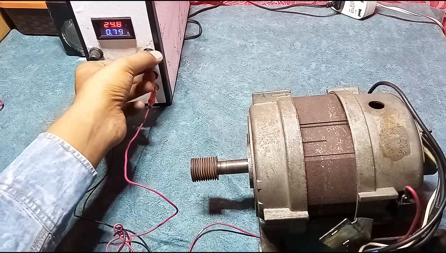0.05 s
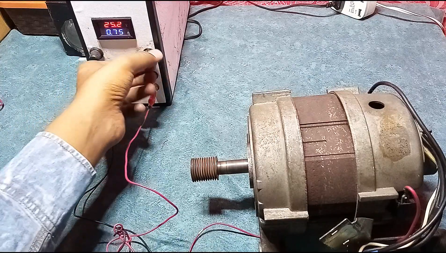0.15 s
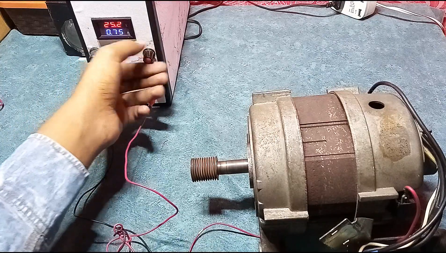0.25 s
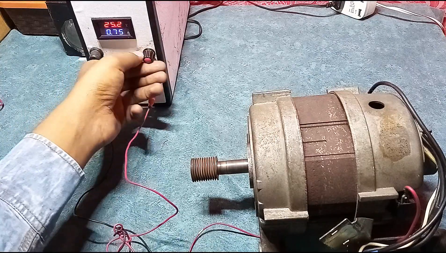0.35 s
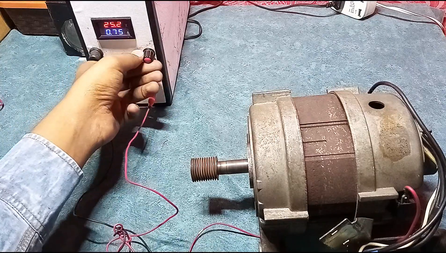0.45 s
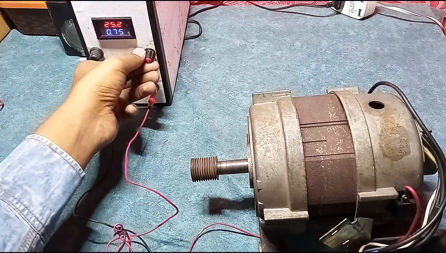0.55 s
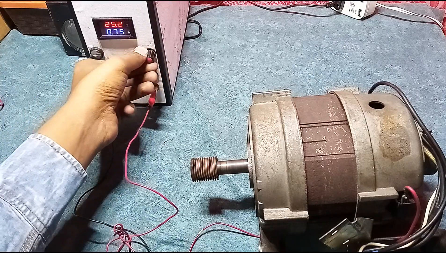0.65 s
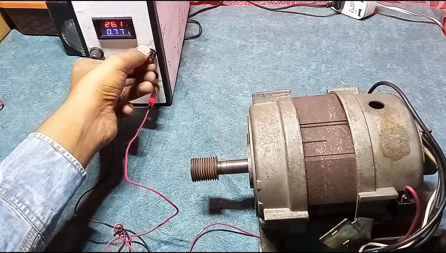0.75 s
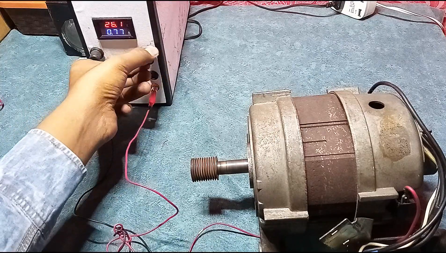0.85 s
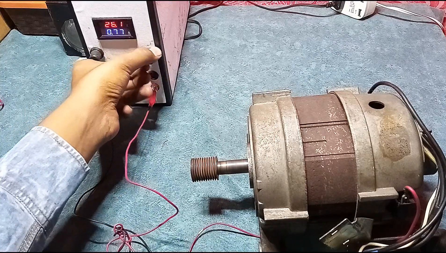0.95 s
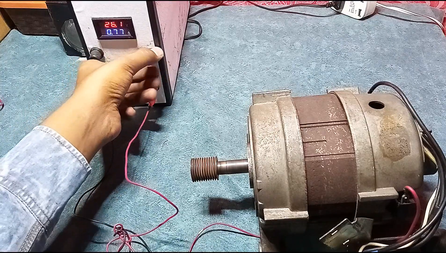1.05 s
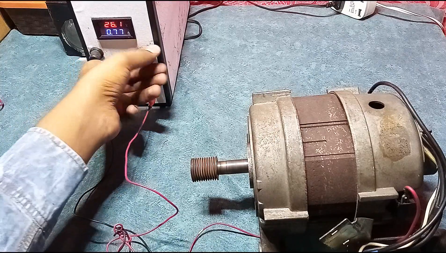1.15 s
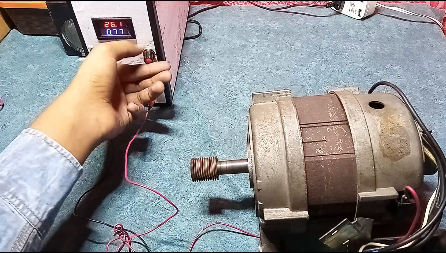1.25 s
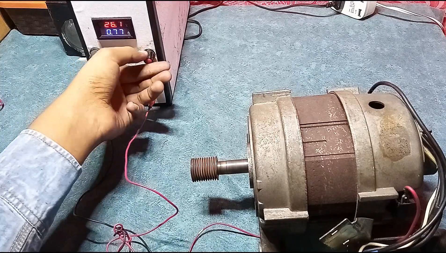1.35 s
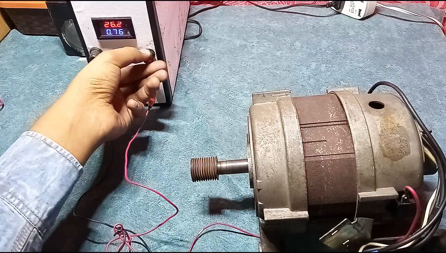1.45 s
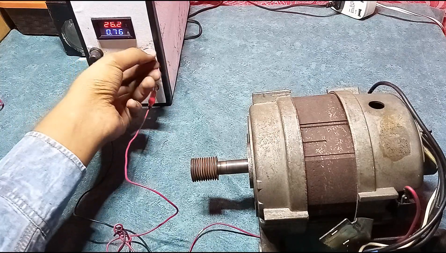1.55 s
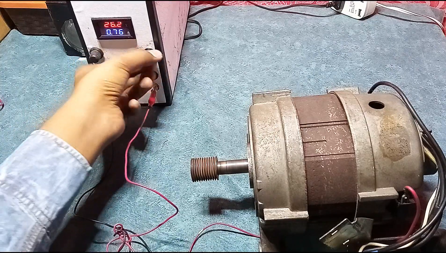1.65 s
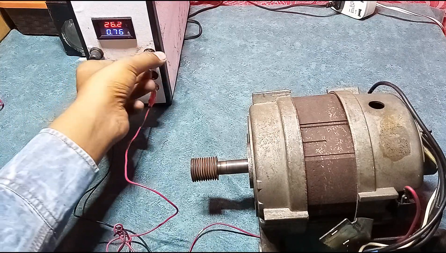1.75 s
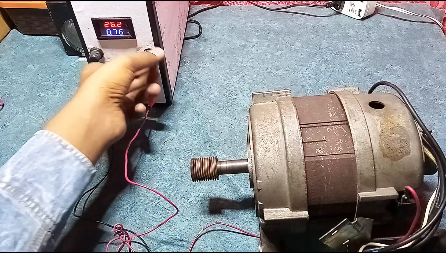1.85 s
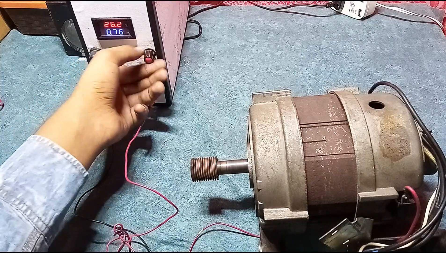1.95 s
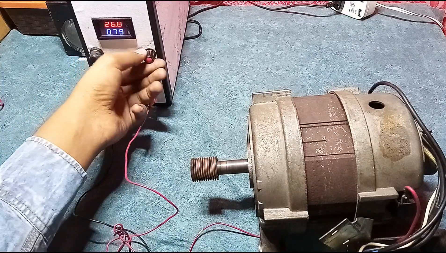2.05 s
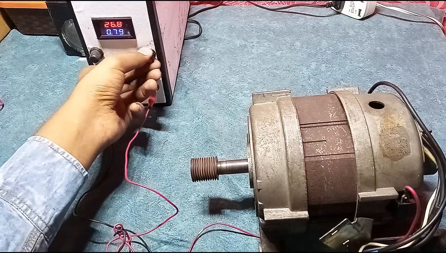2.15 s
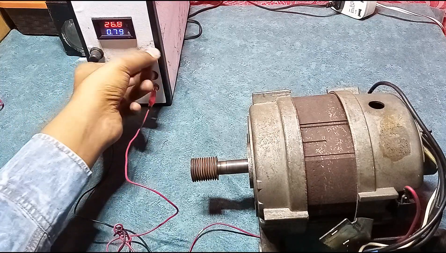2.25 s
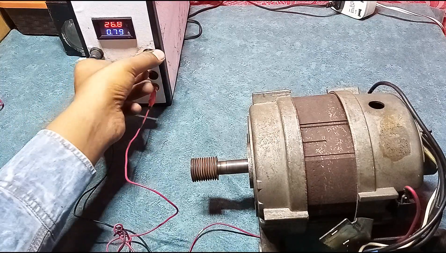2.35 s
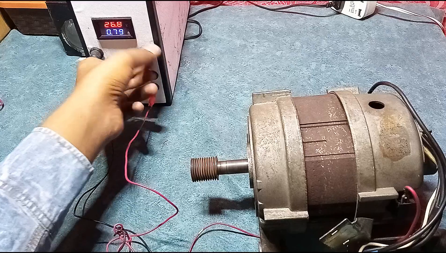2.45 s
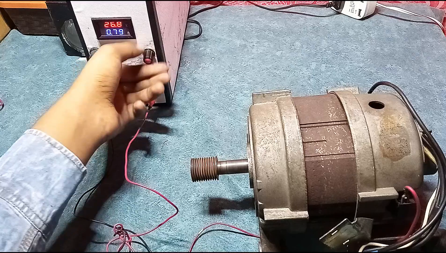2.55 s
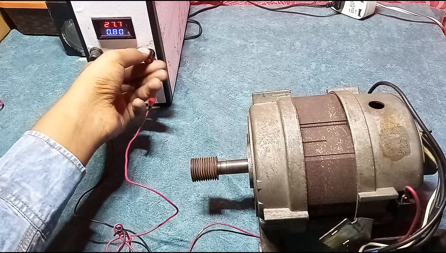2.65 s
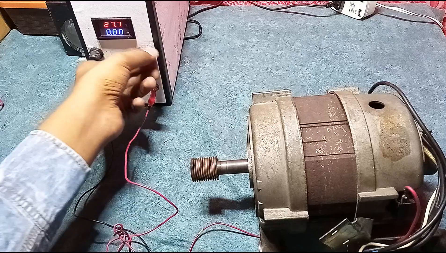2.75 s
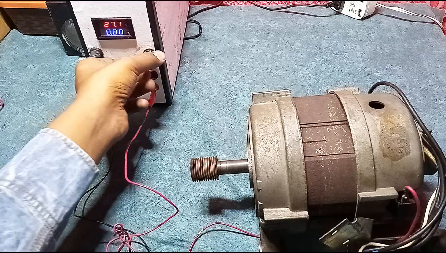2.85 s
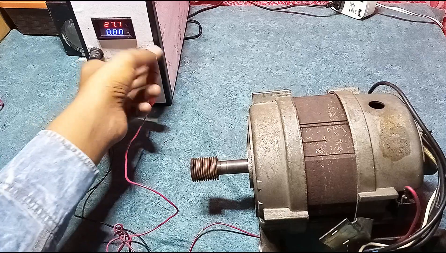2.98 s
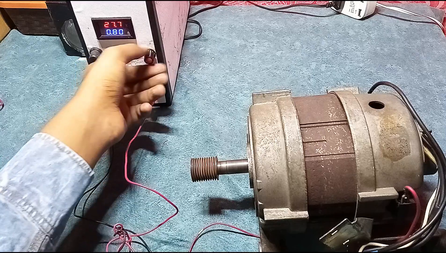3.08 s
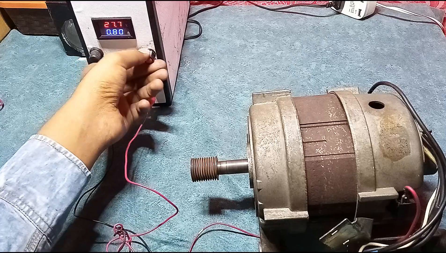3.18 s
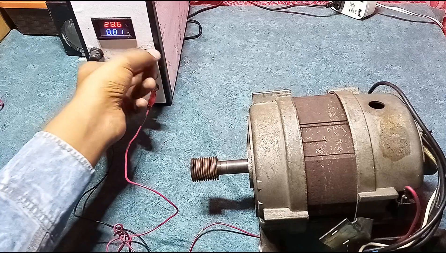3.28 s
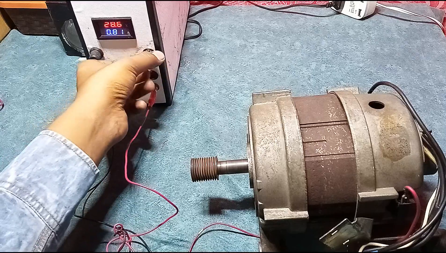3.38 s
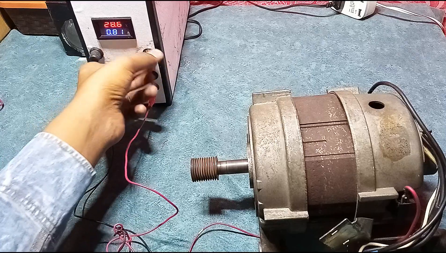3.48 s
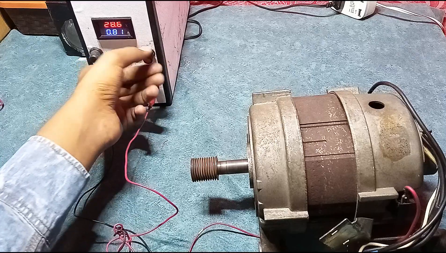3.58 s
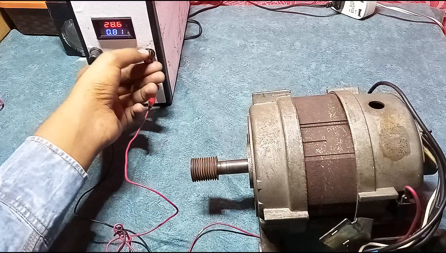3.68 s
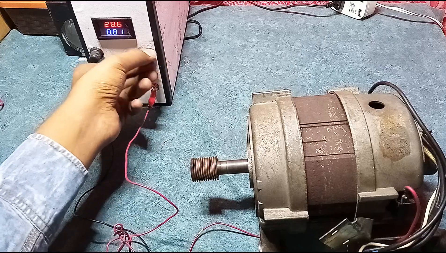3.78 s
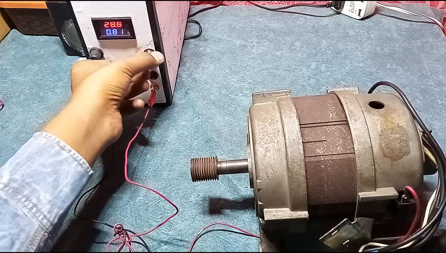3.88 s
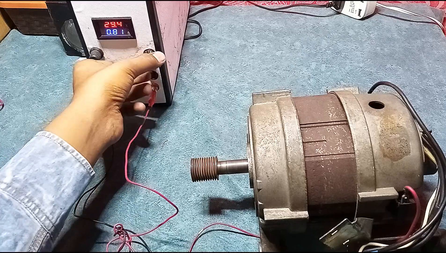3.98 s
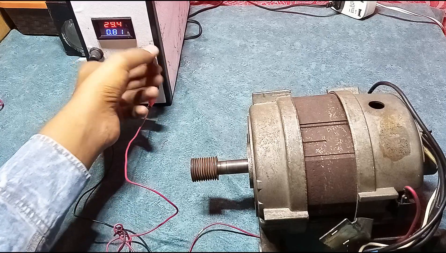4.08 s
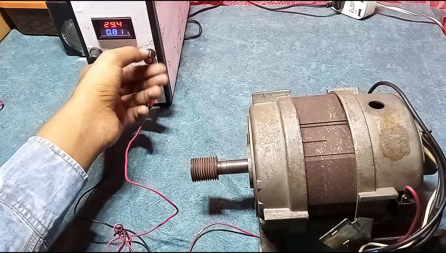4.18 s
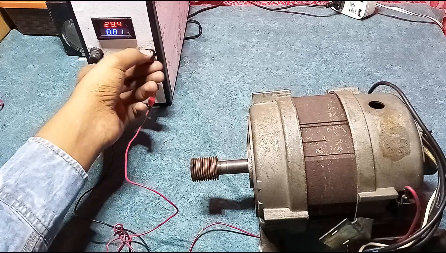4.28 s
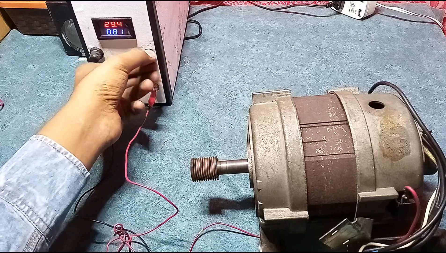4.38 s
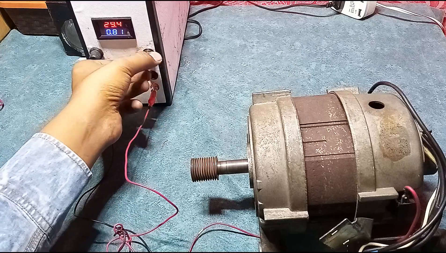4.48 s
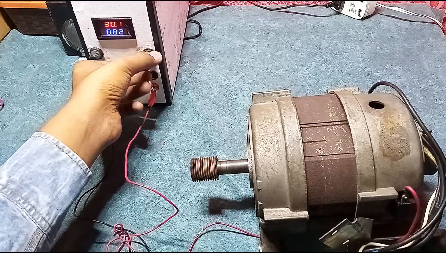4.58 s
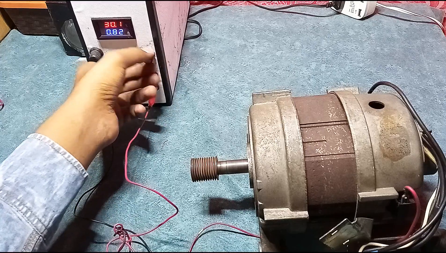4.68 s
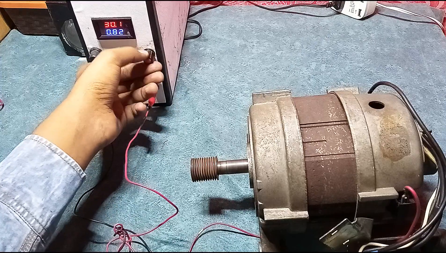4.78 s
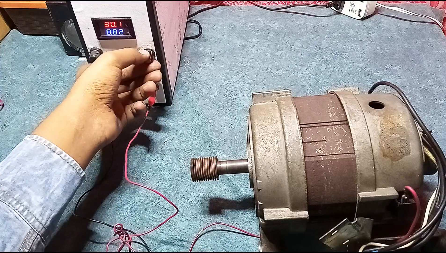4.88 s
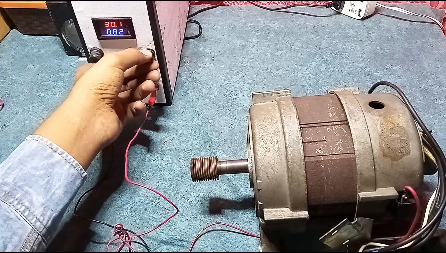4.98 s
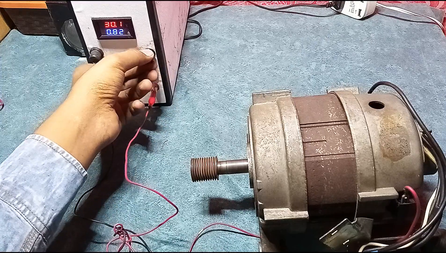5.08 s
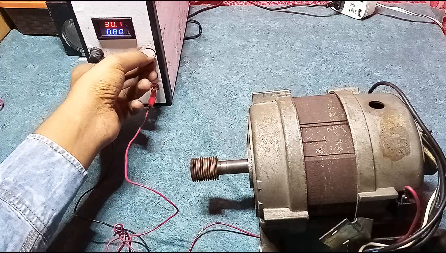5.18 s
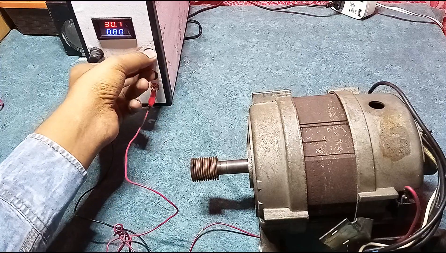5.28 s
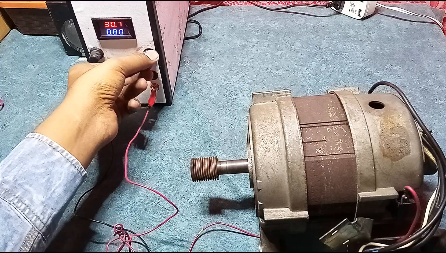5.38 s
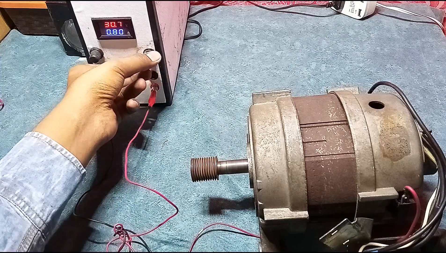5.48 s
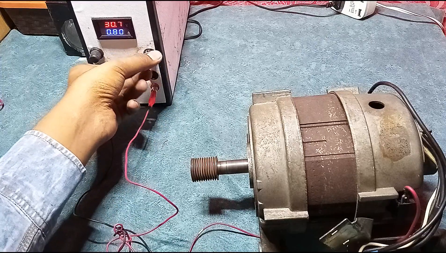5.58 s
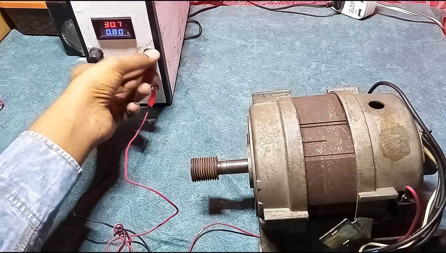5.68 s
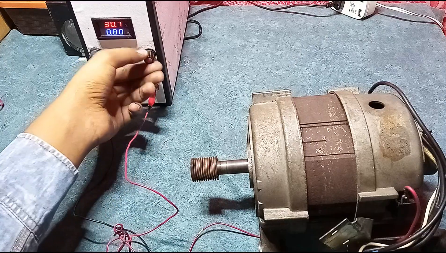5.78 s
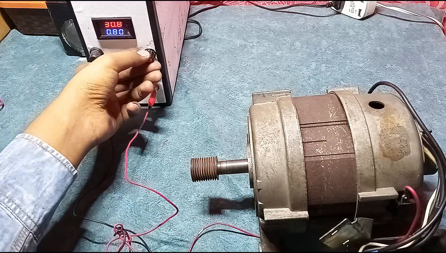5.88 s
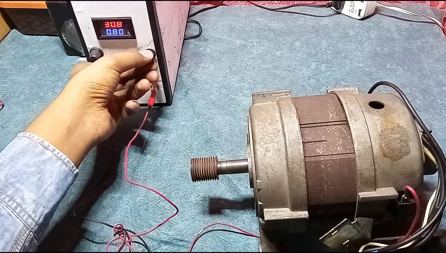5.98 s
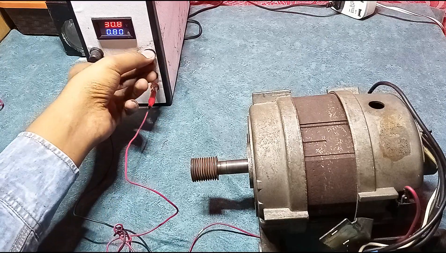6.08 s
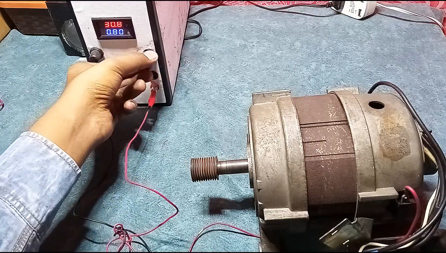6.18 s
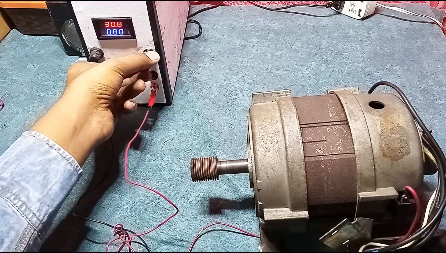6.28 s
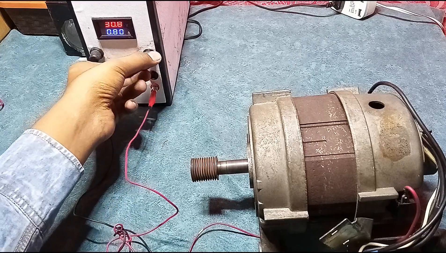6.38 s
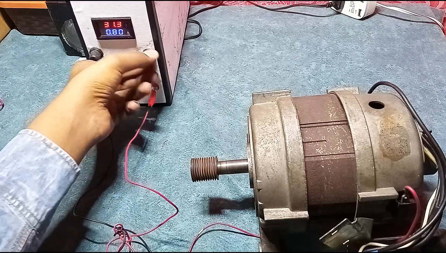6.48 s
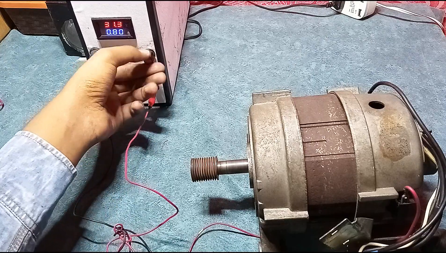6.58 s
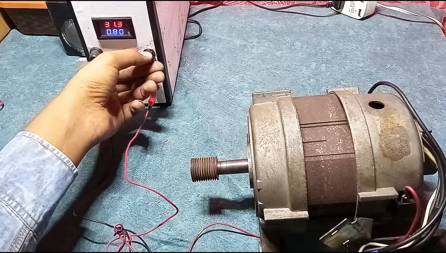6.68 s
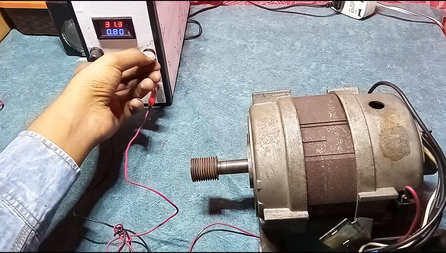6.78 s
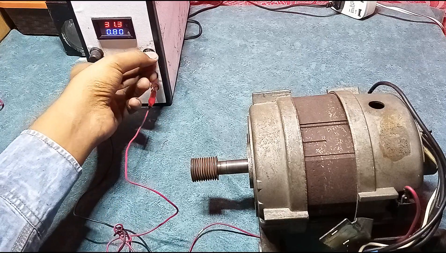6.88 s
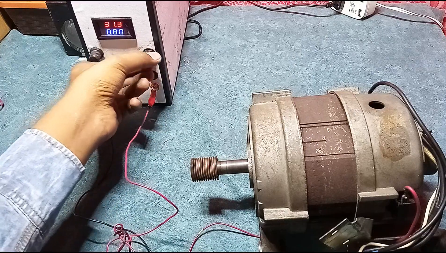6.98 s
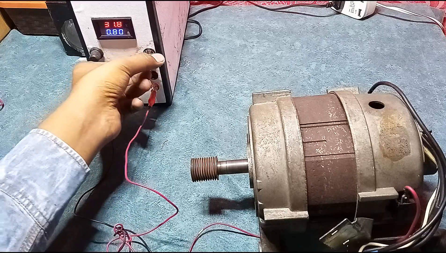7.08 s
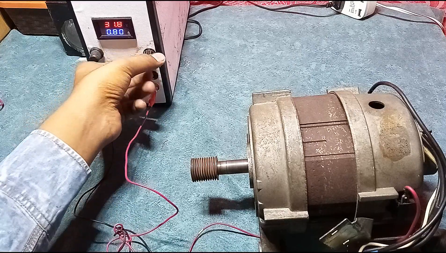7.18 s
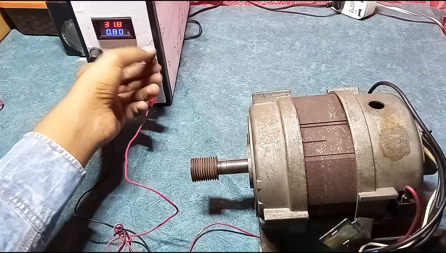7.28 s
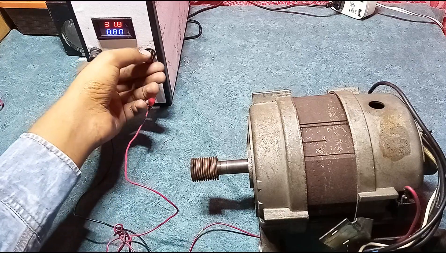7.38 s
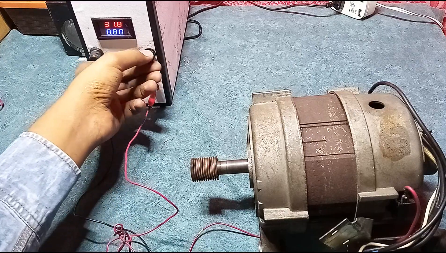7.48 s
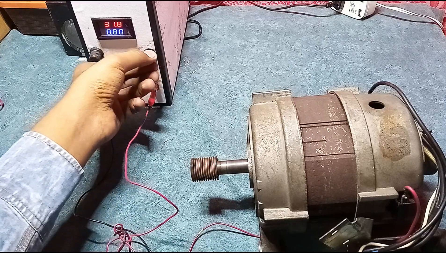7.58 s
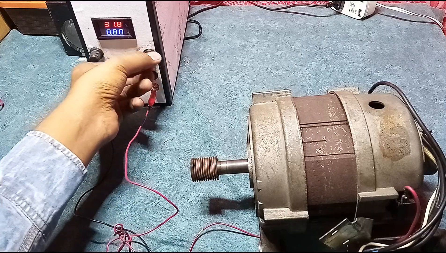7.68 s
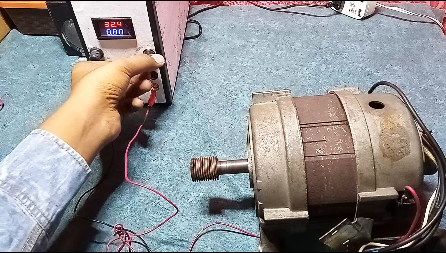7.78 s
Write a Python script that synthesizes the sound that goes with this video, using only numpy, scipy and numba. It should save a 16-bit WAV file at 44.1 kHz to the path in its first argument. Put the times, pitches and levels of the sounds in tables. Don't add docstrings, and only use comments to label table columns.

```python
import sys
import numpy as np
from scipy import signal
from scipy.fft import rfft, irfft, next_fast_len
from scipy.io import wavfile
from scipy.ndimage import uniform_filter1d
from numba import njit

SR = 44100
rng = np.random.default_rng(int(sys.argv[2]) if len(sys.argv) > 2 else 0)


def to_wav(s):
    ch = np.atleast_2d(s).T
    pcm = np.round(np.clip(ch, -1, 1) * 32767)
    wavfile.write(sys.argv[1], SR, pcm.astype(np.int16))


def level_to_linear(level):
    exponent = np.asarray(level, float) / 20
    return 10 ** exponent


N = 345744
BLOCK = 128
INNER, OUTER, REAR = .61168, .38832, .4082
BALL_PASS = 8 * INNER


def rms_one(x):
    return x / np.sqrt(np.mean(x ** 2) + 1e-20)


def band(x, low_hz, high_hz, order=3):
    return signal.sosfilt(signal.butter(order, [low_hz, high_hz], "band", fs=SR, output="sos"), x)


def swell(seconds, crest_s, db, half_s):
    return level_to_linear(db) * np.exp(-((seconds - crest_s) / half_s) ** 2)


def beat(turns, orders_db):
    swing_db = 0
    for order, db in orders_db:
        swing_db = swing_db + db * np.cos(2 * np.pi * (order * turns + rng.random()))
    return level_to_linear(swing_db)


def worn_track(turns, order, lasts_s, uneven_db, sweep=0):
    points, patterns = 2 ** 14, 12
    ripples = int(290 / order)
    depths = level_to_linear(uneven_db * rng.standard_normal(ripples))
    spectra = depths * (rng.standard_normal((patterns, ripples, 2)) @ [1, 1j])
    tracks = np.fft.ifft(spectra, points)
    place = (turns * order % 1 * points).astype(int)
    age = np.arange(N) / SR / lasts_s
    old = np.minimum(age.astype(int), patterns - 2)
    share = age % 1 * np.pi / 2
    read = np.cos(share) * tracks[old, place] + np.sin(share) * tracks[old + 1, place]
    if sweep:
        read = read * np.exp(2j * np.pi * sweep * turns)
    return rms_one(read.real)


# start_s (crest), panel_level_db, half_length_s, bench_level_db
KNOB_SHIFTS = [(0.07, -68, 0.07, -82), (0.244, -61, 0.034, -72), (0.45, -62.5, 0.026, -81),
               (0.923, -65, 0.039, -72), (1.256, -73, 0.045, -79), (1.435, -63, 0.04, -76),
               (1.64, -74, 0.07, -72), (1.83, -67.5, 0.057, -68), (2.074, -63, 0.15, -73),
               (2.425, -68, 0.045, -82), (2.525, -59, 0.049, -79), (2.839, -60, 0.03, -82),
               (3.577, -58.5, 0.033, -85), (4.128, -74, 0.04, -68), (4.65, -60, 0.045, -76),
               (4.93, -67, 0.12, -89), (5.064, -62, 0.03, -75), (5.3, -60.5, 0.06, -76),
               (5.526, -60, 0.07, -71.5), (5.897, -64, 0.04, -61), (6.29, -61, 0.075, -70),
               (6.435, -56.5, 0.023, -82.5), (6.59, -61, 0.043, -73), (6.757, -72.5, 0.025, -89),
               (6.9, -74, 0.15, -79), (7.24, -67, 0.048, -88)]


def knob_boom():
    seconds = np.arange(N) / SR
    panel_gain, bench_gain = level_to_linear(-77), level_to_linear(-76)
    for crest_s, panel_db, half_s, bench_db in KNOB_SHIFTS:
        panel_gain = panel_gain + swell(seconds, crest_s, panel_db, half_s)
        bench_gain = bench_gain + swell(seconds, crest_s, bench_db, half_s)
    panel = band(rng.standard_normal(N), 158.3, 169.7, order=1)
    bench = band(rng.standard_normal(N), 88, 135, order=2)
    skirt = band(rng.standard_normal(N), 72, 400, order=2)
    return panel_gain * rms_one(panel) + bench_gain * rms_one(bench) + level_to_linear(-70.5) * rms_one(skirt)


def brushes(turns):
    heights = level_to_linear(4 * rng.standard_normal(18))
    bar = turns * 36
    ticks = heights[bar.astype(int) % 18] * np.exp(-2.5 * (bar % 1))
    grip = 1 + rms_one(ticks)
    track = worn_track(turns, order=2, lasts_s=.9, uneven_db=2)
    track += level_to_linear(-10) * worn_track(turns, order=1, lasts_s=2.0, uneven_db=3)
    rub = level_to_linear(-1.0) * rng.standard_normal(N) * grip
    balls = level_to_linear(-8) * rng.standard_normal(N) * beat(turns, [(BALL_PASS, 3.0)])
    shake = track + rub + balls
    edges_hz = 8100, 10800, 13150, 14250, 17000
    colour_db = -0.94, 0.12, 1.8, -0.9
    return sum(level_to_linear(db) * band(shake, low, high) for db, low, high in zip(colour_db, edges_hz, edges_hz[1:]))


def shield_ring(turns):
    knocks = beat(turns, [(BALL_PASS, 3.4), (BALL_PASS - 2, 1.7), (2, 1.1)])
    track = sum(worn_track(turns, INNER, lasts_s=.8, uneven_db=3, sweep=k) for k in (1, -2))
    return band((track + level_to_linear(1) * rng.standard_normal(N)) * knocks, 5900, 8200)


def rolling(turns):
    tracks = sum(worn_track(turns, order, lasts_s=1.2, uneven_db=2.5) for order in (INNER, OUTER, REAR, 1))
    load = beat(turns, [(BALL_PASS, 2.5), (2, 1.2)])
    hiss = rng.standard_normal(N) * load
    shake = tracks * load + level_to_linear(3.0) * hiss
    low = level_to_linear(4.0) * band(hiss, 190, 440) + level_to_linear(6.5) * band(hiss, 593, 1290)
    middle = level_to_linear(8.0) * band(hiss, 1360, 1520) + level_to_linear(-2.5) * band(shake, 1305, 3100)
    return low + middle + level_to_linear(-1.0) * band(shake, 3400, 5920)


def race_colour(x, turns):
    rough_orders = 18.7, 21, 26.8, 42, 48, 51.3
    rough_db, width_hz = (5, -1, -6, -4, -5, -7), 70
    span = int(SR / width_hz)
    out = x.copy()
    for order, db in zip(rough_orders, rough_db):
        spin = np.exp(2j * np.pi * order * turns)
        slow = x * spin.conj()
        slow = uniform_filter1d(slow.real, span) + 1j * uniform_filter1d(slow.imag, span)
        out += 2 * (level_to_linear(db) - 1) * (slow * spin).real
    return out


# pitch_hz, level_db
SHELL_RADIATION = [(250, -34.6), (330, -50.0), (450, -55.8), (560, -43.9), (900, -39.1), (1300, -32.0),
                   (1550, -21.9), (2200, -18.1), (4000, -14.2), (6000, -12.9), (9000, -22.5),
                   (11200, -26.5), (13800, -32.0), (15500, -18.5)]
# pitch_hz, width_hz, level_db
HOUSING_MODES = [(380, 58.3, 32), (493, 37, 11.5), (599, 52, 16.5), (793, 72, 13), (970, 21, 12),
                 (1054, 33, 16.5), (1596, 120, 5), (1825, 96, 12), (2145, 110, 6), (2450, 64, 2.5),
                 (2784, 430, 7.5), (3104, 72, -1), (3250, 35, 12), (3410, 29, 10), (3600, 80, 6),
                 (3996, 140, 6.5), (4454, 310, 7.5), (5360, 84, 4.5), (6590, 56, 4), (7005, 251, 30),
                 (7615, 160, 6), (8460, 470, 5), (9750, 718, 18), (10470, 288, 4), (12550, 1500, 13.5),
                 (14480, 468, 12.5), (13900, 300, 4)]
# pitch_hz, width_hz, level_db
BRUSH_COVER_MODES = [(15070, 60, 1), (15300, 60, 14), (15450, 52, 6), (15500, 54, 11)]


def housing(x):
    size = next_fast_len(N + SR // 4)
    hz = np.maximum(np.arange(size // 2 + 1) * SR / size, 1)
    shell_hz, shell_db = np.transpose(SHELL_RADIATION)
    gain = level_to_linear(np.interp(np.log(hz), np.log(shell_hz), shell_db)) + 0j
    scattered = [(at_hz + rng.uniform(-70, 70), 47, 5 * rng.uniform(.5, 1.2))
                 for at_hz in np.arange(8050, 14950, 190)]
    for centre_hz, width_hz, db in HOUSING_MODES + BRUSH_COVER_MODES + scattered:
        detune = (hz / centre_hz - centre_hz / hz) * centre_hz / width_hz
        gain *= 1 + (level_to_linear(db) - 1) / (1 + 1j * detune)
    return irfft(rfft(x, size) * gain, size)[..., :N]


def load_db(speed):
    start, ring_full = 56.4, 64.1
    extra = speed - start
    ring_extra = np.minimum(speed, ring_full) - start
    return -37.5 + 0.11 * extra, -38 + 0.4821 * ring_extra, -42.5 + 0.18 * extra


def motor_noise(turns, speed):
    shakes = race_colour(rolling(turns), turns), shield_ring(turns), brushes(turns)
    rough = housing(np.array(shakes))
    trims_db = -4.8, -4.0, -.8
    return sum(level_to_linear(db + trim) * rms_one(x) for db, trim, x in zip(load_db(speed), trims_db, rough))


# pitch_cycles_per_turn, level_db (between modes)
LOW_BEARING_TONES = [(7.78, -104.5), (8.0, -112.8), (8.16, -93.1), (8.54, -99.9), (8.78, -93.6),
                     (8.92, -102.2), (9.18, -100.3), (9.3, -95.5), (10.18, -103.9), (10.4, -102.3),
                     (10.78, -100.0), (10.98, -113.2), (11.4, -109.8), (11.68, -116.6), (11.84, -96.4),
                     (12.02, -113.7), (12.24, -112.3), (12.42, -105.6), (12.62, -102.1), (12.78, -116.6),
                     (13.06, -111.1), (13.32, -125.2), (13.68, -97.5), (13.9, -120.4), (14.28, -112.6),
                     (14.66, -105.1), (15.12, -106.4), (15.52, -95.9), (15.66, -91.7), (15.92, -101.1),
                     (16.34, -107.2), (16.7, -98.4), (16.98, -114.6), (18.14, -122.7), (18.62, -93.4),
                     (18.76, -111.2), (19.0, -103.3), (19.16, -115.6), (19.58, -100.6), (20.42, -106.6),
                     (20.58, -105.3), (20.78, -108.3), (21.0, -105.7), (21.34, -110.1), (21.74, -105.1)]
MID_BEARING_TONES = [(22.02, -101.2), (22.14, -97.8), (22.86, -97.7), (23.0, -105.4), (23.48, -87.1),
                     (24.1, -89.0), (24.46, -92.5), (24.86, -88.9), (25.22, -100.0), (25.48, -86.4),
                     (26.08, -96.7), (27.14, -104.7), (27.56, -93.8), (27.74, -89.9), (27.96, -91.9),
                     (28.2, -94.5), (28.36, -84.7), (28.76, -103.9), (28.96, -90.7), (29.36, -99.8),
                     (29.74, -94.7), (30.0, -106.7), (30.24, -99.4), (30.36, -87.9), (30.66, -97.4),
                     (31.06, -87.1), (31.44, -94.7), (32.0, -95.0), (32.28, -89.9), (32.64, -90.1),
                     (33.04, -100.0), (33.24, -89.0), (33.64, -97.2), (33.78, -92.7), (33.98, -89.1),
                     (34.24, -86.3), (34.62, -98.6), (34.86, -95.1), (35.22, -99.4), (35.5, -102.2),
                     (36.74, -96.0), (36.88, -95.0), (37.54, -109.1), (37.98, -100.0), (38.14, -100.6),
                     (38.54, -88.9), (38.74, -109.0), (39.14, -87.5), (39.6, -104.7), (39.78, -94.7),
                     (39.98, -96.3), (40.38, -97.2), (40.84, -95.1), (41.16, -102.4), (41.6, -114.9)]
HIGH_BEARING_TONES = [(42.0, -98.8), (42.44, -96.9), (42.7, -89.5), (42.82, -94.2), (43.1, -87.2),
                      (43.44, -89.9), (43.88, -86.1), (44.04, -84.4), (44.64, -92.1), (44.92, -87.2),
                      (45.3, -95.4), (45.42, -96.3), (45.8, -97.2), (46.0, -96.4), (46.2, -86.3),
                      (46.58, -90.6), (46.98, -86.5), (47.36, -87.1), (47.72, -92.5), (47.98, -103.5),
                      (48.32, -87.8), (48.54, -99.3), (48.92, -84.5), (49.3, -87.8), (49.56, -93.1),
                      (49.7, -105.3), (50.08, -90.6), (50.46, -99.0), (50.86, -103.0), (50.98, -110.4),
                      (51.24, -104.1), (51.36, -110.7), (51.98, -99.5), (52.24, -102.9), (52.4, -86.9),
                      (52.8, -101.6), (53.02, -96.6), (53.2, -86.5), (53.82, -87.4), (54.0, -95.8),
                     (54.44, -85.9), (54.82, -104.0), (55.12, -93.4), (55.52, -91.7), (56.0, -102.3),
                     (56.3, -88.3), (56.68, -89.9), (56.96, -107.6), (57.08, -94.6), (57.46, -99.0),
                     (57.72, -100.2), (58.12, -87.7), (58.24, -103.3), (58.72, -86.8), (59.1, -102.1),
                     (59.34, -86.6), (59.68, -103.5), (59.96, -90.6), (60.34, -99.9), (60.78, -99.0),
                     (60.96, -100.3), (61.14, -96.4), (61.4, -100.7), (61.72, -90.8), (62.0, -90.3),
                     (62.4, -92.7), (63.0, -82.2), (63.24, -85.9), (63.62, -79.6), (63.86, -95.7)]
# pitch_hz, width_hz, level_db
FOOT_RESONANCES = [(468, 9, 11.3), (510, 17, 24.9), (580, 19, 15.2), (604, 8, 5.2), (620, 6, 12.5),
                   (649, 18, 14.8), (696, 16, 10.1), (747, 8, 7.5), (783, 39, 17.9), (809, 10, 22.2),
                   (886, 7, 7.0), (990, 8, 25.0), (1037, 55, 9.7), (1065, 7, 23.7), (1425, 63, 25.0),
                   (1476, 5, 9.0)]
# pitch_hz, width_hz, level_db
BARREL_RESONANCES = [(1235, 15, 4.5), (1423, 25, 5.5), (1504, 86, 6.0), (1585, 45, 15.3), (1626, 22, 9.5),
                     (1719, 35, 7.0), (1774, 35, 13.0), (1813, 25, 4.3), (1856, 42, 23.7), (1974, 19, 3.6),
                     (2045, 38, 4.2), (2099, 36, 3.2), (2152, 69, 11.7), (2229, 17, 4.4), (2273, 21, 4.5),
                     (2324, 44, 6.4), (2450, 82, 10.5), (2525, 52, 11.7), (2692, 220, 11.3),
                     (2758, 76, 25.0)]
# pitch_hz, width_hz, level_db
END_SHIELD_RESONANCES = [(2504, 77, 19.0), (2728, 72, 14.1), (2893, 87, 14.0), (3080, 72, 6.9),
                         (3229, 47, 25.0), (3340, 82, 14.2), (3394, 45, 9.2), (3581, 56, 7.1),
                         (3648, 57, 12.0), (3844, 91, 13.7), (3919, 30, 2.4), (4022, 107, 5.3),
                         (4116, 108, 12.1), (4286, 28, 2.5), (4380, 102, 8.7)]


def bearing_tones(speed):
    families = [(LOW_BEARING_TONES, FOOT_RESONANCES, 0.9), (MID_BEARING_TONES, BARREL_RESONANCES, 1.14),
                (HIGH_BEARING_TONES, END_SHIELD_RESONANCES, 1.33)]
    parts = [through_modes(tones, modes, speed, trim_db) for tones, modes, trim_db in families]
    return np.concatenate([orders for orders, _ in parts]), np.concatenate([x for _, x in parts])


def through_modes(tones, modes, speed, trim_db):
    orders, db = np.transpose(tones)
    hz = np.outer(orders, speed)
    strengths = level_to_linear(db + trim_db)[:, None]
    for centre_hz, width_hz, lift_db in modes:
        strengths = strengths * np.abs(1 + (level_to_linear(lift_db) - 1) / (1 + 2j * (hz - centre_hz) / width_hz))
    return orders, strengths


# start_s (crest), pitch_cycles_per_turn, level_db, half_length_s
MAIN_WHINES = [(1.0, 36, -62.1, 0.89), (1.75, 9.787, -52.6, 1.25), (1.75, 18, -64.9, 1.25),
               (2.24, 36, -49.3, 0.89), (2.72, 18, -63.8, 0.15), (2.8, 9.787, -55.8, 0.51),
               (3.27, 36, -52.5, 0.14), (3.6, 18, -63.3, 0.67), (3.61, 9.787, -53.9, 0.26),
               (3.8, 36, -50.1, 0.14), (4.03, 18, -66.0, 0.15), (4.24, 36, -50.7, 0.31),
               (4.25, 9.787, -49.8, 0.27), (4.49, 18, -59.3, 0.31), (5.05, 18, -61.8, 0.33),
               (5.12, 9.787, -51.7, 0.37), (5.38, 36, -51.1, 0.36), (5.91, 18, -57.3, 0.54),
               (5.98, 9.787, -49.3, 0.6), (6.0, 36, -43.5, 0.23), (6.84, 36, -49.3, 0.39),
               (6.97, 18, -57.9, 0.34), (7.3, 9.787, -60.3, 0.78)]
# start_s (crest), pitch_cycles_per_turn, level_db, half_length_s
FAINT_FLARES = [(0.18, 18, -59, .2), (0.7, 36, -58, .12), (1.25, 36, -56, .15), (7.25, 36, -51, .1),
                (3.6, 5.9, -77, 2), (7.1, 5.9, -63, .35), (5.3, 6.21, -73, .4)]
# start_s (crest), pitch_cycles_per_turn, level_db, half_length_s
RACE_RIPPLES = [(0.72, 72.79, -62.7, 1.4), (1.08, 70.12, -58.4, 0.6), (1.43, 72.0, -60.2, 2.2),
                (1.5, 64.23, -62.2, 2.2), (1.7, 69.73, -60.1, 2.2), (1.77, 76.69, -59.2, 1.4),
                (1.98, 69.12, -61.8, 2.2), (2.12, 73.79, -59.9, 2.2), (2.12, 75.02, -60.2, 0.4),
                (2.25, 64.0, -60.9, 2.2), (2.39, 67.9, -61.1, 2.2), (3.06, 90.0, -57.0, 2.2),
                (3.19, 70.12, -59.1, 2.2), (3.32, 73.0, -62.6, 2.2), (3.45, 72.79, -61.5, 2.2),
                (3.71, 71.79, -59.0, 2.2), (4.15, 68.9, -59.7, 1.4), (4.78, 72.0, -56.9, 2.2),
                (4.84, 93.38, -60.0, 2.2), (4.84, 95.23, -62.2, 2.2), (5.45, 66.9, -57.5, 2.2),
                (5.57, 64.0, -58.9, 2.2), (5.99, 79.98, -60.3, 1.4), (6.23, 91.98, -60.6, 0.6),
                (6.29, 65.81, -59.9, 0.4), (6.41, 78.0, -61.1, 2.2), (6.65, 65.23, -59.8, 0.4),
                (6.7, 87.88, -61.4, 2.2), (6.76, 72.0, -60.1, 0.4), (6.88, 90.0, -55.4, 2.2),
                (6.94, 93.23, -58.0, 0.4), (6.94, 94.62, -59.7, 0.6), (7.0, 95.23, -56.2, 0.6), ]
# start_s (crest), pitch_cycles_per_turn, level_db, half_length_s
SHIELD_TONES = [(0.83, 125.65, -52.4, 0.9), (1.11, 122.75, -52.6, 1.4), (1.11, 123.48, -54.3, 1.4),
                (1.74, 114.78, -49.7, 0.4), (2.01, 119.68, -54.4, 1.4), (2.08, 118.83, -52.6, 1.4),
                (2.22, 117.85, -51.4, 2.2), (2.49, 118.43, -50.6, 2.2), (2.76, 117.65, -47.1, 0.9),
                (2.89, 106.05, -55.8, 2.2), (3.16, 114.78, -46.0, 1.4), (3.29, 115.23, -52.6, 1.4),
                (3.55, 112.95, -48.2, 0.9), (3.61, 113.55, -54.0, 1.4), (3.8, 112.75, -49.7, 0.9),
                (3.87, 110.9, -52.0, 1.4), (3.87, 112.33, -52.2, 2.2), (4.38, 110.5, -47.6, 2.2),
                (4.5, 109.73, -47.7, 0.9), (4.5, 109.93, -54.0, 2.2), (4.56, 101.98, -54.5, 2.2),
                (4.56, 109.28, -51.9, 1.4), (4.56, 110.3, -49.7, 1.4), (4.93, 108.5, -49.6, 0.9),
                (5.06, 106.83, -50.2, 2.2), (5.12, 107.9, -51.5, 2.2), (5.18, 107.45, -45.6, 2.2),
                (5.3, 100.75, -52.7, 1.4), (5.48, 99.53, -54.8, 1.4), (5.61, 106.05, -47.3, 1.4),
                (5.91, 105.45, -48.2, 0.9), (5.91, 114.78, -56.0, 2.2), (5.97, 105.0, -46.9, 2.2),
                (5.97, 105.65, -52.8, 2.2), (6.14, 103.18, -49.6, 2.2), (6.2, 98.25, -49.5, 0.4),
                (6.2, 104.8, -49.2, 0.4), (6.26, 102.55, -48.5, 1.4), (6.32, 104.2, -49.5, 0.4),
                (6.38, 104.4, -50.8, 2.2), (6.67, 103.62, -49.3, 1.4), (6.85, 100.75, -45.1, 0.6),
                (6.85, 109.73, -54.1, 2.2), (6.91, 101.98, -44.8, 0.9), (6.97, 101.15, -49.1, 1.4),
                (7.02, 99.53, -47.8, 0.6), (7.02, 99.98, -50.7, 0.6), (7.08, 110.5, -53.1, 1.4)]
# start_s (crest), pitch_cycles_per_turn, level_db, half_length_s
BAR_TONES = [(0.27, 128.71, -55.1, 0.4), (0.56, 130.0, -56.3, 0.4), (0.77, 144.0, -58.3, 0.9),
             (0.92, 127.04, -58.4, 0.9), (1.48, 174.0, -60.8, 2.2), (2.57, 149.96, -59.7, 1.4),
             (2.84, 138.0, -60.9, 2.2), (2.91, 161.96, -59.1, 2.2), (3.11, 144.0, -56.6, 2.2),
             (3.17, 132.0, -60.0, 2.2), (3.3, 142.0, -60.9, 2.2), (3.43, 134.0, -59.9, 2.2),
             (3.76, 153.96, -60.5, 2.2), (3.82, 129.29, -61.6, 2.2), (3.82, 135.96, -60.2, 2.2),
             (4.52, 155.96, -59.5, 2.2), (5.32, 149.96, -56.6, 2.2), (6.1, 227.96, -60.7, 2.2),
             (6.16, 138.0, -56.4, 2.2), (6.28, 142.36, -57.6, 0.6), (6.34, 226.0, -61.0, 2.2),
             (6.45, 144.0, -56.1, 2.2), (6.51, 132.0, -55.8, 2.2), (6.57, 130.0, -59.3, 2.2),
             (6.63, 142.0, -57.5, 2.2), (6.75, 134.0, -55.2, 2.2), (6.92, 216.04, -57.6, 0.6),
             (7.04, 222.0, -59.9, 2.2)]


def swelling_tones(seconds):
    tables = MAIN_WHINES, FAINT_FLARES, RACE_RIPPLES, SHIELD_TONES, BAR_TONES
    trims_db = 0.26, 0.4, 0.3, 0.3, 0.27
    strengths = {}
    for table, trim_db in zip(tables, trims_db):
        for crest_s, order, db, half_s in table:
            rise = swell(seconds, crest_s, db + trim_db, half_s)
            strengths[order] = strengths.get(order, 0) + rise
    orders = sorted(strengths)
    return np.array(orders), np.array([strengths[order] for order in orders])


def tone_wobble(orders, strengths):
    span = int(.05 * SR / BLOCK)
    flicker = rng.standard_normal((2, *strengths.shape))
    flicker = rms_one(uniform_filter1d(uniform_filter1d(flicker, span), span))
    is_main = np.isin(orders, [row[1] for row in MAIN_WHINES])
    depth = np.where(is_main, .15, .55 * np.sqrt(orders / 110))[:, None]
    wobble = 1 + depth * (flicker[0] + 1j * flicker[1]) / np.sqrt(2)
    return strengths * wobble / np.sqrt(1 + depth ** 2)


@njit
def spun_sines(turns, orders, starts, swells, block):
    out = np.zeros(len(turns))
    for k in range(len(orders)):
        for i in range(0, len(turns) - block, block):
            pointer = swells[k, i // block] * np.exp(2j * np.pi * (orders[k] * turns[i] + starts[k]))
            step = np.exp(2j * np.pi * orders[k] * (turns[i + block] - turns[i]) / block)
            for j in range(i, i + block):
                out[j] += pointer.imag
                pointer *= step
    return out


def whine(turns, speed):
    swell_orders, swells = swelling_tones(np.arange(0, N, BLOCK) / SR)
    steady_orders, steady = bearing_tones(speed[::BLOCK])
    orders = np.r_[swell_orders, steady_orders]
    strengths = tone_wobble(orders, np.r_[swells, steady])
    return spun_sines(turns, orders, rng.random(len(orders)), np.sqrt(2) * strengths, BLOCK)


# start_s, speed_turns_per_s
SHAFT_SPEED = [(0.0, 54.844), (0.5, 55.723), (1.0, 56.663), (1.5, 57.48), (1.75, 57.842), (2.25, 58.812),
               (2.75, 59.916), (3.25, 61.059), (3.75, 62.231), (4.25, 63.425), (5.0, 65.163),
               (5.25, 65.593), (5.75, 66.591), (6.0, 67.075), (6.5, 67.944), (7.0, 68.864), (7.3, 69.3)]


def scene():
    at_s, turns_per_s = np.transpose(SHAFT_SPEED)
    speed = np.interp(np.arange(N) / SR, at_s, turns_per_s)
    turns = np.cumsum(speed) / SR
    mono = motor_noise(turns, speed) + whine(turns, speed) + knob_boom()
    return np.array([mono, mono])


def low_pass(x):
    return signal.sosfilt(signal.butter(12, 16950, fs=SR, output="sos"), x)


def record(dry):
    top_hz, stop_s, fade_s = 15740, 7.2509, .0004
    edge = signal.ellip(16, .3, 90, top_hz, fs=SR, output="sos")
    gate = np.clip((stop_s - np.arange(N) / SR) / fade_s, 0, 1)
    return low_pass(signal.sosfilt(edge, dry) * gate)


dry = scene()
out = record(dry)
to_wav(out)
```